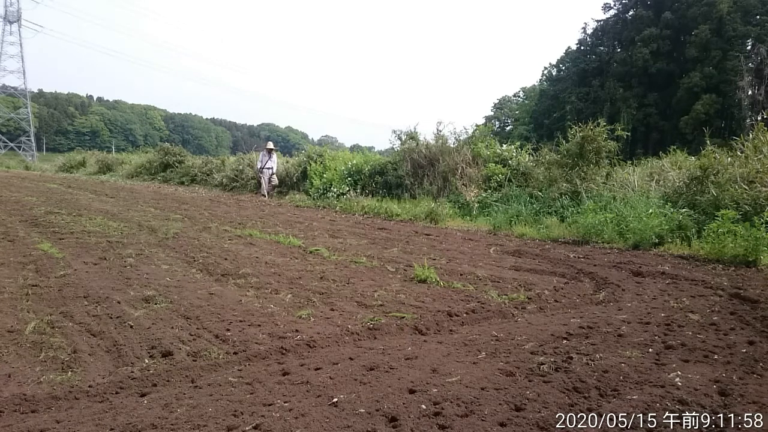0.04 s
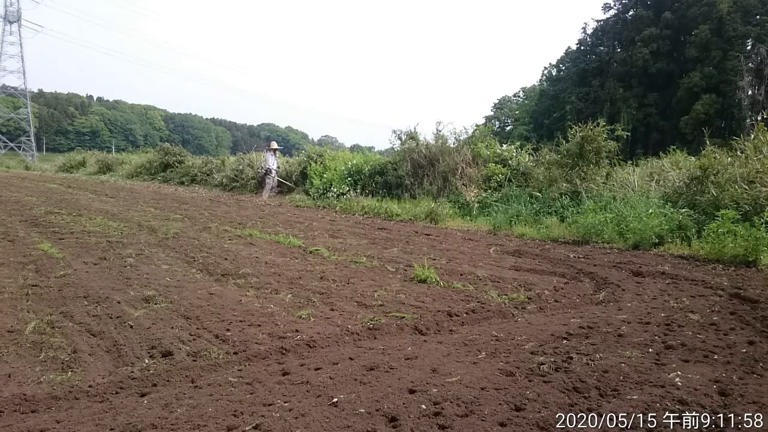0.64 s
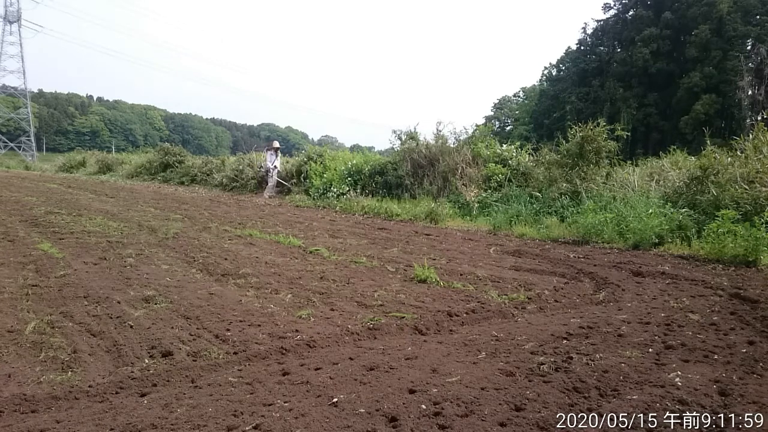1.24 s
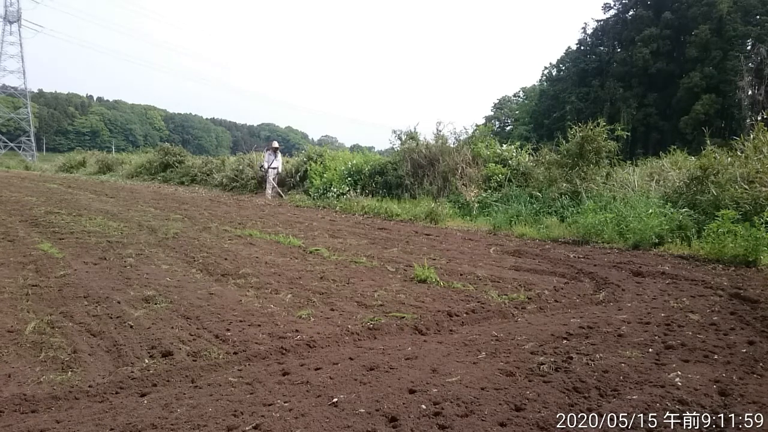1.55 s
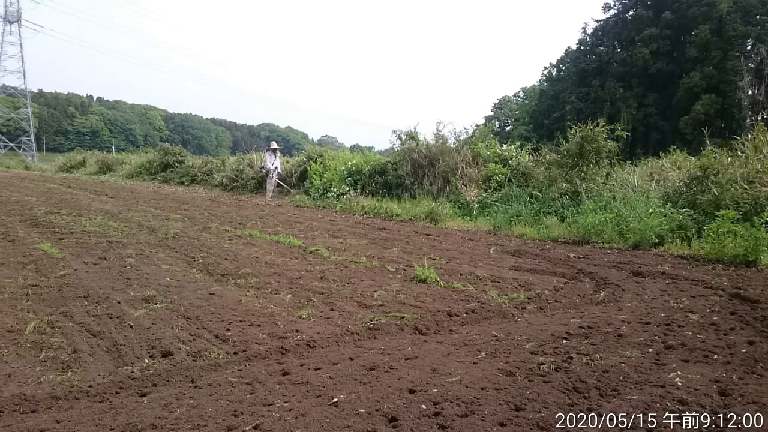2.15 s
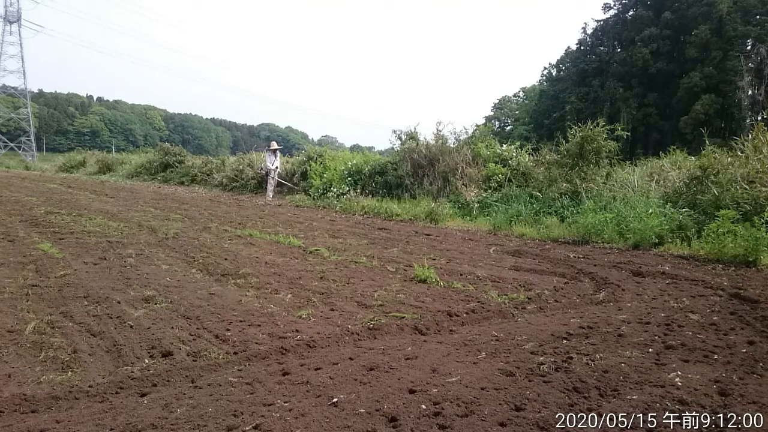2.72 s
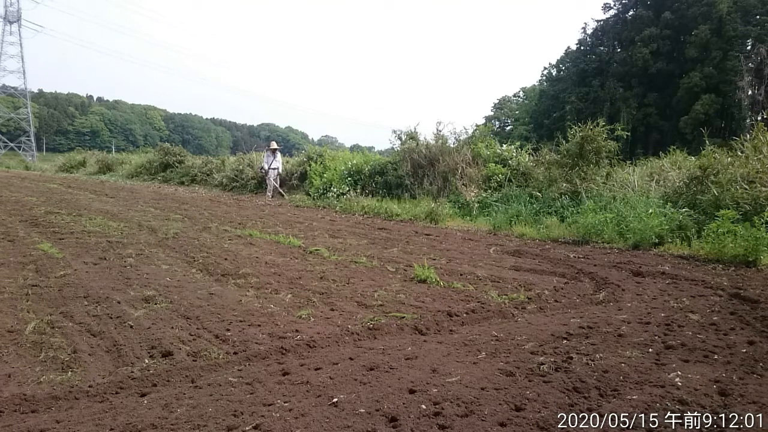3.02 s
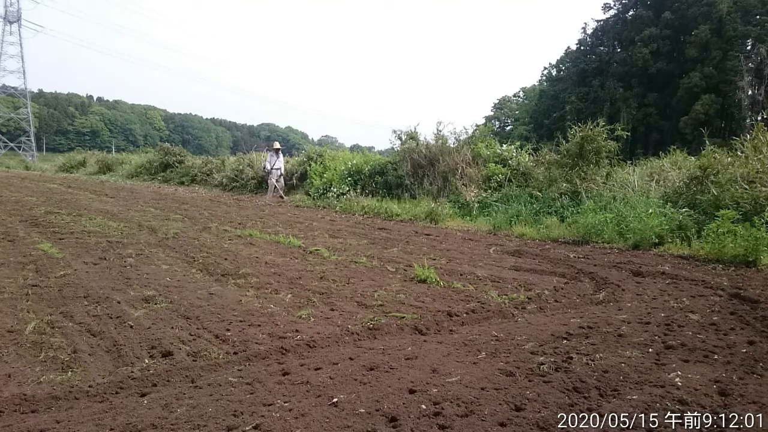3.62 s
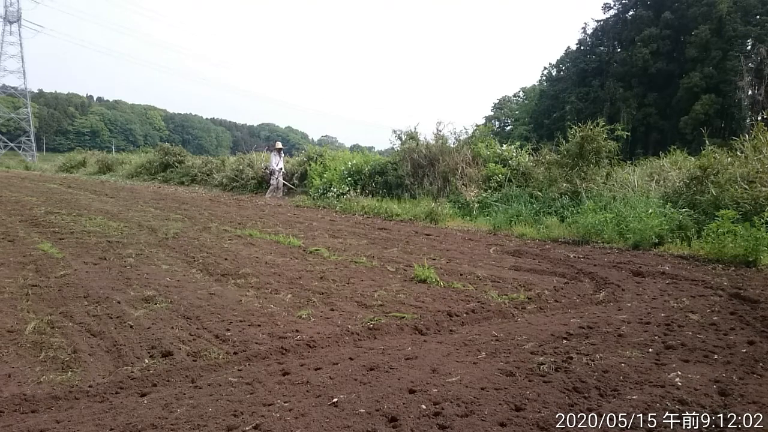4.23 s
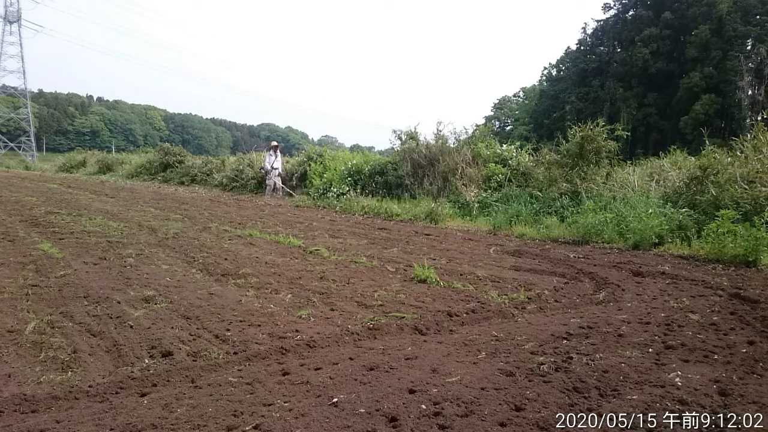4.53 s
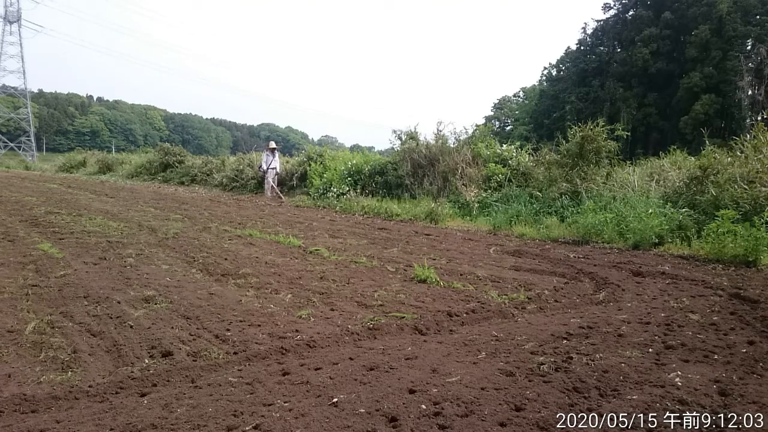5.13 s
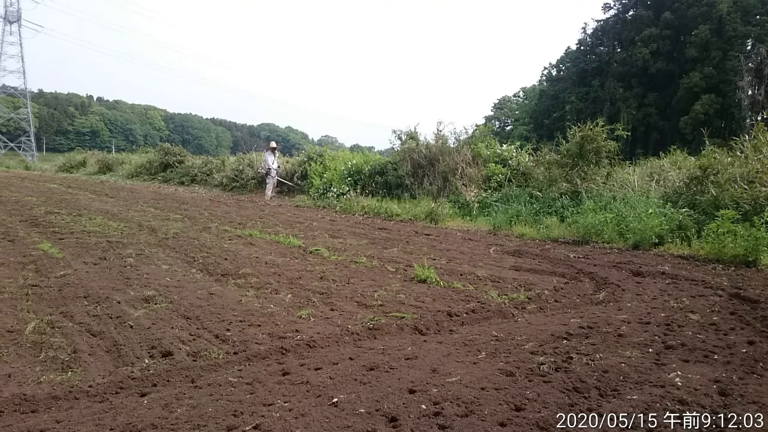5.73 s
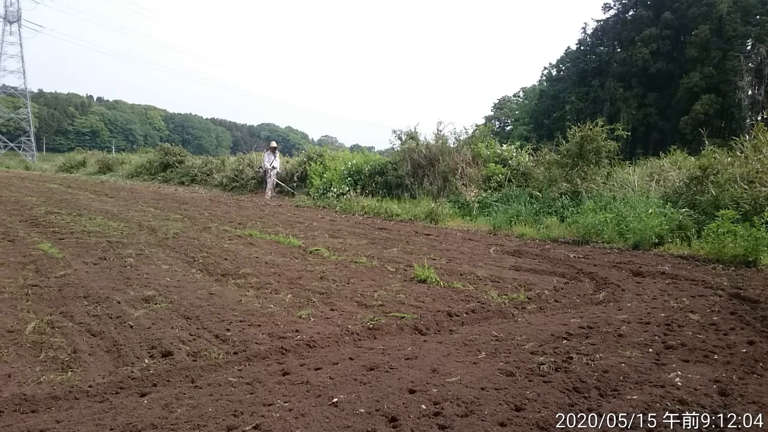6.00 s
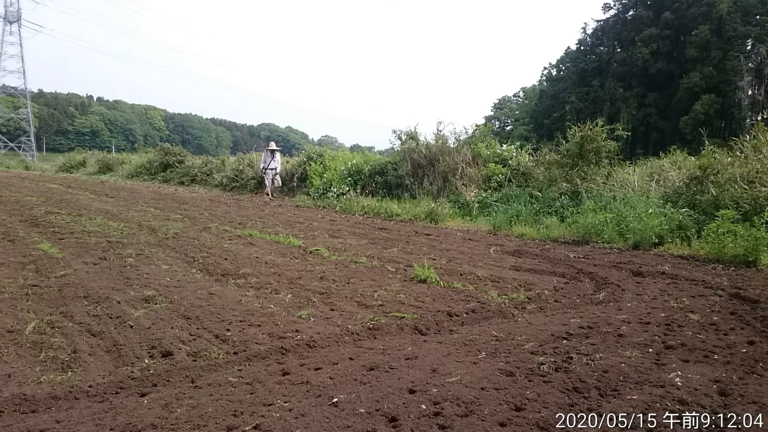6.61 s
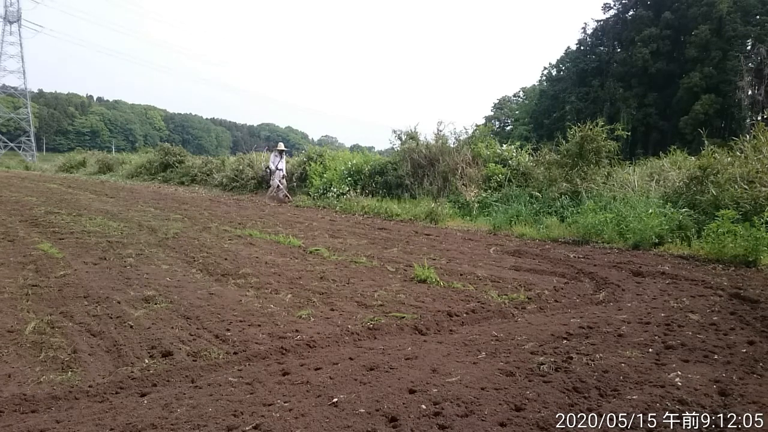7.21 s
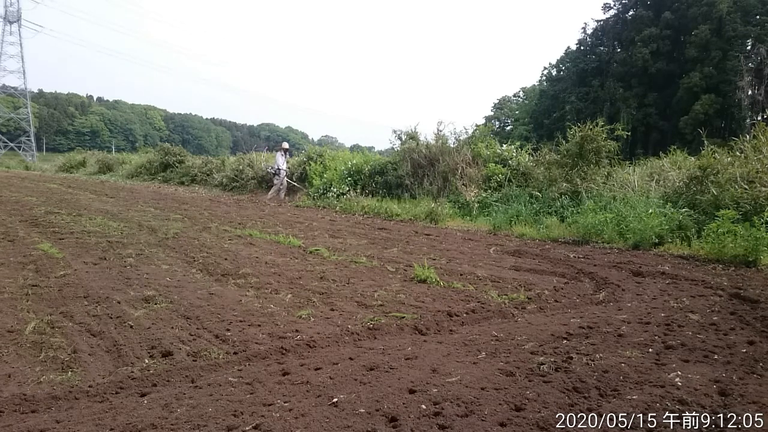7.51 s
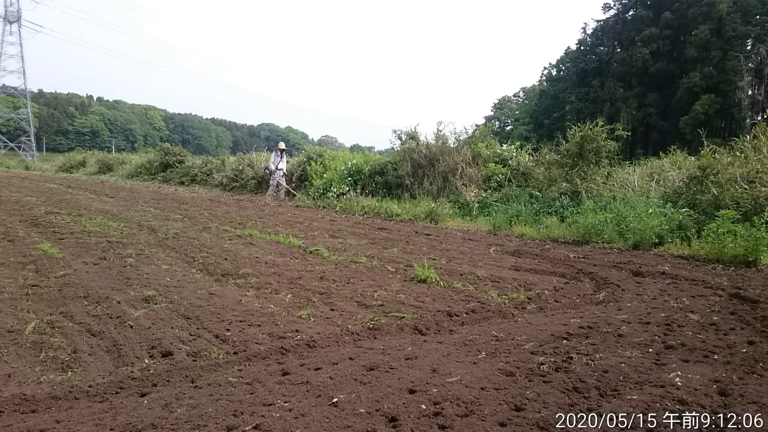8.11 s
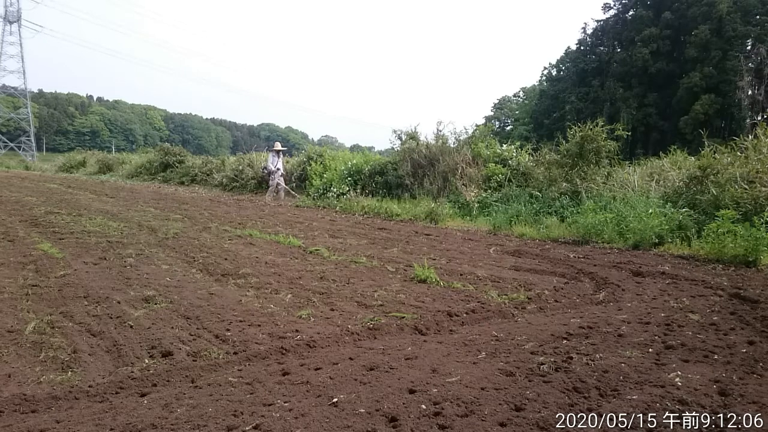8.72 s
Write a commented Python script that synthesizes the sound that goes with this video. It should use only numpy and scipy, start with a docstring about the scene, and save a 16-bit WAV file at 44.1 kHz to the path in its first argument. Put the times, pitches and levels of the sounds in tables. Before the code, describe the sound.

A small brush cutter engine buzzes, dipping with each swing into weeds, with metallic blade ringing, a few sharp ticks and light wind.

```python
"""A small two-stroke brush cutter runs at the weedy edge of a field, its toothed steel blade whirring,
while light wind buffets two microphone ports. At about 0.6 s the first swing into the weeds drags the
engine down; stems crackle and excite the blade's modes. The engine recovers, and further swings follow
near 2.2, 3.8 and 5.3 s, the teeth striking something hard most loudly at 2.3 and 5.4 s. From 7.2 s
the longest cut loads the engine again and keeps the blade singing."""
import sys
import numpy as np
from scipy import signal
from scipy.fft import rfft, irfft, next_fast_len
from scipy.io import wavfile

SR = 44100
rng = np.random.default_rng(int(sys.argv[2]) if len(sys.argv) > 2 else 0)


def transcribe(u):
    """Save the signal u as a 16-bit wav file named by the first command-line argument.

    u: samples, shape (n,) or (channels, n), limited to [-1, 1]; the rate is SR.
    q: integer samples, one column per channel.
    """
    v = np.clip(np.atleast_2d(u).T, -1, 1)
    q = np.round(v * 32767).astype(np.int16)
    wavfile.write(sys.argv[1], SR, q)


N = 394694
TIME = np.arange(N) / SR

# How hard the engine works: time_s, effort_db
EFFORT = [(0, -1), (.28, -2), (.44, 0), (.63, 6.5), (.87, 3.5), (1.0, 5), (1.45, 2), (1.78, -4),
          (2.02, -2.5), (2.27, 5.5), (2.98, 3), (3.32, -4), (3.63, -2), (3.9, 4.5), (4.25, 1.5),
          (4.72, 0.5), (5.02, -0.5), (5.3, -0.5), (5.5, 5), (6.2, 4), (6.52, 0), (7.08, -2.5), (7.33, -0.5),
          (8.08, 0.5), (8.6, -3.5), (8.95, 4.5)]
# Under heavy load the engine fires on every turn instead of every second one: time_s, share (0-1)
FULL_FIRING = [(.8, 0.4), (.87, 0.86), (1.2, 0.84), (1.35, 0.06), (7.72, 0.16), (7.85, 0.5), (7.98, 0.55),
               (8.08, 0)]


def amp(db):
    """Amplitude ratio of a level in decibels."""
    return 10 ** (np.asarray(db) / 20)


def unit(x):
    """Normalisation to rms 1."""
    return x / np.sqrt(np.mean(x ** 2) + 1e-20)


def curves(rows):
    """Linear interpolation of each column of a time table, sample by sample."""
    times_s, *columns = np.transpose(rows)
    return [np.interp(TIME, times_s, column) for column in columns]


def colour(x, spectrum):
    """Spectral shaping by rows of frequency_hz, gain_db."""
    hz, db = np.transpose(spectrum)
    size = next_fast_len(N, True)
    gain = amp(np.interp(np.log(np.fft.rfftfreq(size, 1 / SR) + 1), np.log(hz), db))
    return irfft(rfft(x, size) * gain, size)[:N]


def noise():
    """Gaussian white noise of rms 1."""
    return rng.standard_normal(N)


def wander(per_s):
    """Slow random modulation of rms about 1."""
    knots = rng.standard_normal(4096)
    return np.interp(TIME * per_s, np.arange(len(knots)), knots)


def ring(x, hz, width_hz):
    """Forced response of a steep resonator whose centre frequency may glide; rms 1."""
    carrier = np.exp(2j * np.pi * np.cumsum(hz * np.ones(len(x))) / SR)
    pole = np.exp(-np.pi * width_hz * np.sqrt(2) / SR)
    return unit((carrier * signal.lfilter([1], [1, -2 * pole, pole * pole], x / carrier)).real)


def grains(per_s, spread_db):
    """Shot noise: sparse clicks of very unequal size; rms 1."""
    size = amp(spread_db * np.minimum(rng.exponential(1, N), 4))
    return unit(noise() * size * (rng.random(N) < per_s / SR))


def swells(rows, rise_s, fall_s):
    """Incoherent sum: events rise, hold and die away, and their powers add to give one gain."""
    power = np.zeros(N)
    for start_s, length_s, db in rows:
        away = np.maximum(start_s - TIME, 0) / rise_s + np.maximum(TIME - start_s - length_s, 0) / fall_s
        power += (amp(db) * np.exp(-np.minimum(away, 20))) ** 2
    return np.sqrt(power)


def add(mix, start_s, sound):
    """Superposition of a sound on the mix, in place."""
    part = mix[max(round(start_s * SR), 0):][:len(sound)]
    part += sound[:len(part)]


def wind(gain_db=6, correlation=-0.61):
    """Turbulent pressure: breeze and gusts buffet the two ports, largely in antiphase."""
    # The breeze at the microphone: time_s, level_db
    breeze = [(0, -71), (.8, -63.5), (1.2, -70), (2.3, -65.5), (3.5, -69), (4.3, -60), (5.9, -67.5),
              (6.7, -65), (7.9, -68), (8.95, -62.5)]
    # Single gusts: start_s, length_s, level_db
    gusts = [(3.1, 0.023, -57), (3.97, 0.1, -56), (5.09, 0.032, -57), (6.37, 0.022, -61),
             (7.39, 0.054, -60), (7.62, 0.014, -54), (8.24, 0.17, -53.5), (8.74, 0.023, -58)]
    # Spectrum of the buffeting: frequency_hz, gain_db
    buffet = [(15, -24), (35, -21), (60, 3.5), (95, -2), (140, -2), (220, -13.5), (400, -17), (1000, -58)]
    blow = np.hypot(amp(curves(breeze)[0]), swells(gusts, rise_s=.04, fall_s=.04))
    left, independent = (unit(colour(noise(), buffet)) for _ in range(2))
    right = correlation * left + np.sqrt(1 - correlation ** 2) * independent
    return amp(gain_db) * blow * np.array([amp(-3) * left, right])


def crank_pulse(turn_phase):
    """Impulse and exponential decay, once for each whole step of the phase."""
    return np.exp(-(turn_phase % 1) / .13)


def gear_head(cycles):
    """Forced vibration: each strong turn of the crank shakes the gear head at the end of the shaft."""
    # Its resonances: frequency_hz, width_hz, gain_db
    modes = [(2819, 103, -9.5), (6660, 100, -15.5)]
    # Moments when it rings up: start_s, length_s, level_db
    surges = [(.72, 0.13, -37), (1.29, 0.038, -41), (4.02, 0.34, -35.5), (5.57, 0.19, -31)]
    effort_db, = curves(EFFORT)
    running = amp(-44 + .17 * effort_db + 2 * wander(9.8))
    shake = noise() * (.2 + crank_pulse(cycles))
    ringing = sum(amp(db) * ring(shake, hz, width) for hz, width, db in modes)
    return np.hypot(running, swells(surges, rise_s=.048, fall_s=.048)) * ringing


def engine_clatter(cycles, speed_hz):
    """Amplitude-modulated noise: a puff at each turn of the crank, strong and weak in turn."""
    # Spectral density of the clatter: frequency_hz, density_db
    spectrum = [(150, -99), (400, -92), (580, -85), (740, -80.5), (1100, -79.5), (1700, -79.5),
                (2150, -88.5), (2500, -74), (2900, -71.5), (3400, -75), (4300, -81.5), (5500, -78.5),
                (10000, -114), (15000, -103)]
    effort_db, = curves(EFFORT)
    full_firing, = curves(FULL_FIRING)
    puffs = crank_pulse(cycles) + np.interp(full_firing, [0, .5], [.55, 1]) * crank_pulse(cycles + .5)
    sharp = unit(noise() * (.7 + puffs))
    blurred = unit(noise() * (1 + puffs))
    drive = colour(sharp, [(2000, 0), (2500, -3), (3500, -20)])
    drive += colour(blurred, [(1800, -20), (2500, -3), (3000, 0)])
    clatter = np.sqrt(SR / 2) * colour(drive, spectrum)
    cover_buzz = amp(-48 + .39 * (speed_hz - speed_hz.mean())) * ring(blurred, 2123, 350)
    return amp(-2 + .7 * effort_db - 4 * full_firing) * (clatter + cover_buzz)


def engine_tone(cycles, speed_hz, gain_db=-0.67, waver_db=2.5, flutter_db=1.5, smear_s_per_hz=1.1e-6):
    """Source and filter: the engine's harmonics sweep through the muffler's fixed resonances."""
    # Harmonics of the cycle; odd ones come from the alternation of strong and weak turns:
    # multiple, level_db, db_per_effort_db, full_firing_gain_db
    partials = [(2, -53.5, 0.2, 3), (3, -72, 0.2, -18), (4, -69.0, -0.3, 2), (5, -66.0, 0.9, -20),
                (6, -67.5, 0.8, 0), (7, -65.0, 0.2, -18), (8, -70.0, 1.1, -9), (10, -58.0, 0.7, -6),
                (12, -63.0, 0.2, -1), (13, -66.0, 0.8, -16), (14, -59.0, 1.1, -8), (15, -62.0, 0.3, -22),
                (16, -63.0, -0.8, 2), (17, -66.5, 0.1, -14), (18, -61.5, 0.8, 0), (19, -64.0, 0.8, -19),
                (20, -65.5, -0.1, -2), (21, -68.5, 0.8, -13), (22, -61.0, 0.9, -3), (23, -68.5, 1.3, -20),
                (24, -65.5, 1.5, -1), (25, -69.5, 0.8, -14), (26, -61.5, 0.6, 2), (27, -65.5, 0.0, -9),
                (28, -62.0, 0.4, 4), (30, -63.5, 0.2, 1), (32, -65.0, 0.3, -1), (34, -62.0, 1.2, -5),
                (36, -61.5, 0.9, -5), (38, -66.0, 0.5, -2), (40, -66.0, 0.6, -1), (42, -62.5, 0.7, -2)]
    # The muffler's resonances: frequency_hz, half_width_hz, lift_db
    muffler = [(682, 88, 11), (990, 55, 4), (1246, 107, 4), (1500, 150, 5.5), (1840, 26, 3), (2066, 80, 6),
               (2307, 108, 7), (2806, 135, 7)]
    effort_db, = curves(EFFORT)
    full_firing, = curves(FULL_FIRING)
    grid_hz = np.arange(0, 4000, 8)
    peaks = [amp(db) / (1 + ((grid_hz - hz) / width) ** 2) for hz, width, db in muffler]
    lift_db = 10 * np.log10(1 + sum(peak ** 2 for peak in peaks))
    uneven = wander(70)
    out = np.zeros(N)
    for k, level_db, follows, full_db in partials:
        hz = k * speed_hz
        db = level_db + follows * effort_db + full_db * full_firing + np.interp(hz, grid_hz, lift_db)
        if k > 20:
            db += 1  # rasp
        lag = np.pi * smear_s_per_hz * (hz - 1200) ** 2  # each pulse's treble arrives after its bass
        phase = 2 * np.pi * k * cycles - lag
        if k > 2:
            db += waver_db * wander(9)  # moving air
            db += flutter_db * (uneven + wander(45)) / 2  # uneven firing
            phase += .8 * rng.standard_normal() + .1 * wander(30)
        out += amp(db) * np.cos(phase)
    return amp(gain_db) * np.sqrt(2) * out


def blade_bite():
    """Excitation envelope: how hard the blade bites into uneven clumps of weeds."""
    # The clumps: start_s, length_s, strength_db
    cuts = [(.57, 0.35, -46.5), (.71, 0.062, -35.5), (1.15, 0.052, -52.5), (1.32, 0.14, -48.5),
            (1.61, 0.013, -46.5), (2.17, 0.22, -40.5), (2.46, 0.071, -41), (2.9, 0.17, -48.5),
            (3.79, 0.073, -42.5), (3.9, 0.2, -45), (4.32, 0.18, -50.5), (4.75, 0.1, -58),
            (5.33, 0.24, -45.5), (5.69, 0.052, -49), (6.11, 0.023, -46.5), (7.2, 1.3, -49.5),
            (7.38, 0.32, -41), (7.55, 0.02, -36.5), (8.3, 0.089, -42.5), (8.74, 0.14, -42.5)]
    return swells(cuts, rise_s=.068, fall_s=.052) * amp(.5 * wander(28))


def blade_whirr(speed_hz, bite):
    """Aerodynamic noise: a broad rush and a fuzzy whistle of the teeth; both swell in the weeds."""
    # Air noise as the disc turns to and from the listener: time_s, level_db
    whirr = [(0, -41.5), (.35, -44), (1.0, -46), (1.35, -41), (1.85, -40.5), (2.6, -40), (2.95, -38),
             (3.65, -41.5), (4.45, -42.5), (4.75, -38.5), (5.25, -43), (5.85, -40), (6.6, -38.5),
             (7.8, -39), (8.95, -40)]
    # Spectrum of the rush: frequency_hz, gain_db
    rush_spectrum = [(3000, -4.5), (5000, -12), (6400, 9.5), (8400, 7), (9200, 5.5), (10500, -3),
                     (12500, 0), (15500, -12)]
    # The whistle climbs as the blade spins up: speed_hz, pitch_hz
    whistle_pitch = [(63, 5500), (68, 6450), (72, 7420), (76, 8200), (80, 8550)]
    free_running = amp(curves(whirr)[0] + .23 * curves(EFFORT)[0])
    whistle = ring(noise(), np.interp(speed_hz, *np.transpose(whistle_pitch)), width_hz=1060)
    rush = unit(colour(noise(), rush_spectrum))
    return np.hypot(free_running, amp(-5) * bite) * (amp(-7) * rush + amp(-8) * whistle)


def strikes(tooth_hz=560, release_s=.0029, after_s=.17):
    """Impact excitation: teeth rattle on a stone or woody stem with a snap, a knock and a bright clank."""
    # The hits: start_s, level_db, contact_s, knock_hz, after_ring_db
    hits = [(0.6173, -27.5, 0.0073, 3670, -9.5), (0.807, -38, 0.0072, 2290, -7),
            (1.26, -42, 0.0057, 3320, -16), (2.2505, -24, 0.001, 3570, -14), (2.26, -18, 0.003, 3800, -17),
            (2.269, -26, 0.011, 3620, -18), (5.4195, -23.5, 0.0056, 3260, -14),
            (6.067, -35.5, 0.003, 3100, -22), (7.365, -37.5, 0.0044, 3440, -24),
            (7.574, -41, 0.0064, 3180, -20), (8.659, -38.5, 0.0068, 3400, -22),
            (8.741, -40, 0.0064, 3400, -20)]
    # Resonances common to all hits: frequency_hz, width_hz, gain_db
    clank_modes = [(6700, 2330, 22), (8540, 1240, 9)]
    out, t = np.zeros(N), np.arange(SR // 3) / SR
    for start_s, level_db, contact_s, knock_hz, after_db in hits:
        teeth = unit(rng.standard_normal(len(t)) * (.8 + np.exp(-(t * tooth_hz % 1) / .25)))
        modes = [(knock_hz, 750, 19), *clank_modes]
        clank = unit(sum(amp(db) * ring(teeth, hz, width) for hz, width, db in modes))
        envelope = np.exp(-np.maximum(t - contact_s, 0) / release_s) + amp(after_db) * np.exp(-t / after_s)
        add(out, start_s, amp(level_db) * envelope * (clank + amp(-17) * teeth))
    return out


def chinks(per_s=110, low_hz=5900, high_hz=9800, mean_decay_s=.008, spread_db=3.5):
    """Damped free vibration: single teeth chink on stems, each at a pitch of its own; rms 1."""
    out, t = np.zeros(N), np.arange(SR // 20) / SR
    for when, pitch, size, sustain in rng.random((int(per_s * N / SR), 4)):
        hz = low_hz + (high_hz - low_hz) * pitch ** .7
        age = t / (mean_decay_s * (.5 + sustain))
        strength = amp(spread_db * min(-np.log(1 - size), 3))
        envelope = np.exp(-age) - np.exp(-10 * age)
        add(out, when * N / SR, strength * envelope * np.sin(2 * np.pi * hz * t))
    return unit(out)


def blade_ring(speed_hz, lead_db=3.5):
    """Modal response: under a hail of stems the blade's modes share its energy, the lead shifting."""
    # The steel disc's modes at middling speed: frequency_hz, width_hz, gain_db
    modes = [(3300, 420, 5), (5700, 26, 3.5), (6320, 40, 2), (6620, 380, 5), (7200, 18, 10), (7900, 18, 8),
             (8280, 80, 4), (8560, 20, 11), (9110, 24, 10), (9420, 24, 10.5), (9620, 24, 6.5)]
    stretch = 1 + .19 * (speed_hz / 69 - 1) + .0008 * wander(40)  # spin stiffens the disc
    hail = grains(per_s=3000, spread_db=2.5)
    shares = np.array([amp(db + lead_db * wander(10)) for _, _, db in modes])
    shares /= np.linalg.norm(shares, axis=0)
    return unit(sum(share * ring(hail, hz * stretch, width) for share, (hz, width, _) in zip(shares, modes)))


def tough_stalks(steel, gain_db=-10, other_modes_db=-5):
    """Friction excitation: a tough stalk bows one blade mode for a moment, the others more faintly."""
    # The stalks: start_s, level_db, pitch_hz, length_s
    stalks = [(0.53, -34, 7250, 0.14), (0.669, -32, 3350, 0.036), (0.79, -34, 3050, .03),
              (0.685, -24, 8950, 0.032), (0.728, -16, 9440, 0.048), (0.748, -17, 9120, 0.029),
              (.792, -17, 8900, 0.043), (0.81, -34, 5580, 0.084), (0.82, -45, 7060, 0.073),
              (0.885, -36, 6100, 0.08), (1.26, -35, 6540, 0.069), (1.35, -35, 5700, 0.13),
              (1.288, -35, 3200, 0.058), (1.263, -39, 3300, 0.029), (1.299, -28, 6460, 0.023),
              (1.329, -25, 9620, 0.076), (2.215, -23, 7220, 0.075), (2.336, -22, 8340, 0.013),
              (2.3425, -16.5, 7200, 0.025), (2.29, -30, 5700, 0.07), (2.385, -27, 5670, 0.071),
              (2.376, -22, 6600, 0.016), (2.47, -31, 6780, 0.14), (2.883, -29, 3270, 0.032),
              (3.776, -26, 7350, 0.049), (3.828, -25, 7300, 0.03), (3.972, -31, 5700, 0.057),
              (4.069, -28, 6680, 0.035), (4.058, -36, 3350, 0.061), (4.08, -45, 8240, .04),
              (5.693, -32, 5700, 0.1), (7.206, -32, 3830, 0.032), (7.245, -30.5, 7320, 0.066),
              (7.369, -25, 6440, 0.024), (7.364, -28, 8300, 0.025), (7.367, -21.5, 9530, 0.093),
              (7.389, -23, 8560, 0.04), (7.462, -26, 8900, 0.04), (7.506, -18.5, 6640, 0.045),
              (7.512, -28, 3414, 0.036), (7.545, -19.5, 6480, 0.052), (7.553, -19.5, 8500, 0.036),
              (7.562, -22, 9200, .04), (7.651, -21.5, 8860, 0.039), (7.698, -24, 9020, 0.034),
              (7.723, -34.5, 3260, 0.066), (7.718, -19.5, 6230, 0.086), (7.76, -37.5, 8460, 0.13),
              (7.81, -31, 3120, 0.061), (8.038, -37, 3350, 0.06), (8.101, -41.5, 5680, 0.45),
              (8.315, -26.5, 7910, 0.094), (8.331, -31, 7170, 0.089), (8.742, -22, 9440, 0.04)]
    out, t = np.zeros(N), np.arange(SR // 2) / SR
    for start_s, level_db, pitch_hz, length_s in stalks:
        age = 4 * t / length_s
        envelope = amp(level_db + gain_db) * age * np.exp(1 - age)
        mode = ring(rng.standard_normal(len(t)), pitch_hz, width_hz=25)
        song = np.sqrt(2) * np.cos(np.angle(signal.hilbert(mode)))  # even in level, restless in pitch
        song *= amp(1.3 * wander(140)[:len(t)])  # the teeth chatter on the stalk
        other_modes = np.roll(steel, -round(start_s * SR))[:len(t)]
        add(out, start_s - .003, envelope * (song + amp(other_modes_db) * other_modes))
    return out


def cutting(speed_hz, bite, ring_db=2, shred_db=-2.5, chink_db=-13):
    """Random impacts: weeds crackle as they are shredded and set the steel blade ringing."""
    # Spectrum of the shredding: frequency_hz, gain_db
    shred_spectrum = [(500, -36), (900, -49), (1500, -4), (3200, -0.5), (4600, -0.5), (6500, -14),
                      (9400, 5.5), (10800, -0.5), (15000, -9)]
    steel = blade_ring(speed_hz)
    stems = unit(colour(grains(per_s=6000, spread_db=2), shred_spectrum))
    flicker = amp(3.04 * wander(60))
    weeds = flicker * (amp(ring_db) * steel + amp(shred_db) * stems) + amp(chink_db) * chinks()
    return bite * weeds + tough_stalks(steel)


def brush_cutter(cycles, speed_hz, bite):
    """Superposition of engine, gear head and blade, all driven at one speed."""
    engine = engine_tone(cycles, speed_hz) + engine_clatter(cycles, speed_hz)
    return engine + gear_head(cycles) + blade_whirr(speed_hz, bite) + cutting(speed_hz, bite) + strikes()


def ports(direct, scattered):
    """Partial coherence: the two ports differ in colour and phase, and share less of the treble."""
    # The microphone pair: frequency_hz, left_minus_right_db, coherence, left_lead_rad
    pair = [(140.0, -1.06, 0.98, 2.81), (350.0, -4.35, 0.88, 2.97), (700.0, -6.42, 0.96, 3.63),
            (1200.0, -7.85, 0.92, 4.19), (2000.0, -6.41, 0.8, 5.55), (2900.0, -2.69, 0.73, 6.39),
            (3600.0, -6.39, 0.64, 6.73), (4400.0, -3.53, 0.39, 8.6), (5400.0, 4.26, 0.38, 8.71),
            (6300.0, 14.35, 0.46, 8.85), (7300.0, 14.18, 0.34, 12.99), (8600.0, 15.77, 0.29, 13.87),
            (9600.0, 5.77, 0.58, 13.7), (10700.0, -1.04, 0.39, 15.41), (13500.0, -10.59, 0.16, 17.63)]
    hz, *columns = np.transpose(pair)
    bins_hz = np.fft.rfftfreq(N, 1 / SR)
    balance_db, coherence, lead_rad = (np.interp(bins_hz, hz, column) for column in columns)
    right = rfft(direct)
    left = (coherence * right + np.sqrt(1 - coherence ** 2) * rfft(scattered)) * np.exp(1j * lead_rad)
    return irfft([left * amp(balance_db / 2), right * amp(-balance_db / 2)], N)


def scene():
    """Two-path propagation: the cutter reaches the ports directly and by scattering, and wind adds in."""
    # Engine cycles per second, each one strong and one weak turn of the crank: time_s, speed_hz
    engine_speed = [(0.0, 72.8), (0.35, 75.9), (0.5, 76.7), (0.69, 70.8), (0.84, 61.7), (1.02, 64.6),
                    (1.62, 71.8), (2.09, 75.9), (2.19, 75.6), (2.54, 68.3), (3.11, 73.7), (3.61, 77.5),
                    (3.76, 76.3), (4.04, 67.8), (4.16, 66.2), (4.44, 66.8), (4.98, 74.6), (5.21, 75.8),
                    (5.33, 69.4), (5.76, 67.9), (6.5, 75.7), (7.1, 79.5), (7.2, 79.4), (7.4, 68.0),
                    (7.75, 63.2), (8.08, 67.3), (8.23, 66.8), (8.52, 70.6), (8.75, 72.1), (8.95, 69.1)]
    speed_hz, = curves(engine_speed)
    cycles = np.cumsum(speed_hz * (1 + .001 * wander(70))) / SR
    bite = blade_bite()
    direct, scattered = (brush_cutter(cycles, speed_hz, bite) for _ in range(2))
    return ports(direct, scattered) + wind()


def record(dry):
    """Band limiting: a steep low-pass filter at 15450 Hz."""
    low_pass = signal.firwin(511, 15450, window=("kaiser", 9), fs=SR)
    return signal.oaconvolve(dry, low_pass[None], "same")


dry = scene()
out = record(dry)
transcribe(out)
```